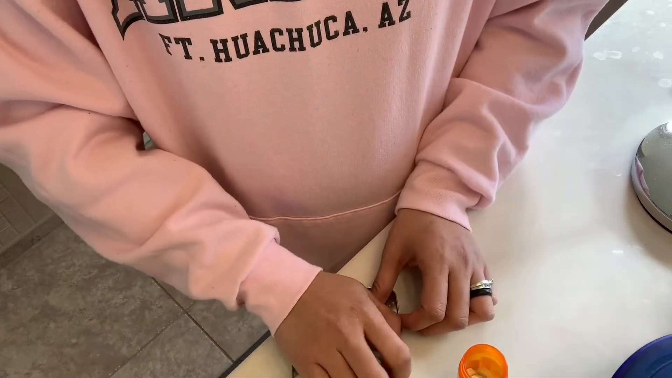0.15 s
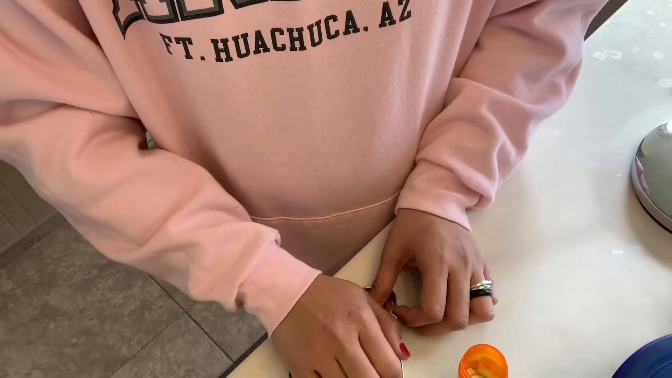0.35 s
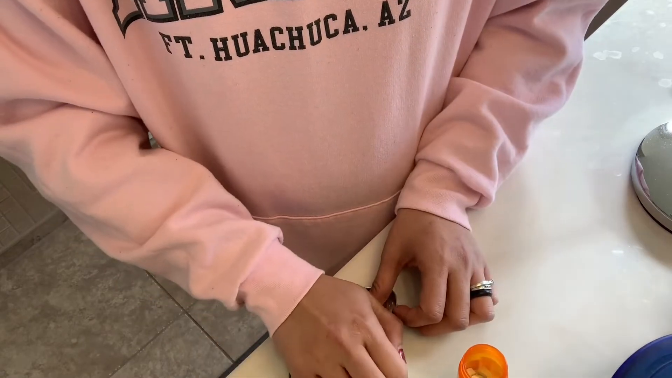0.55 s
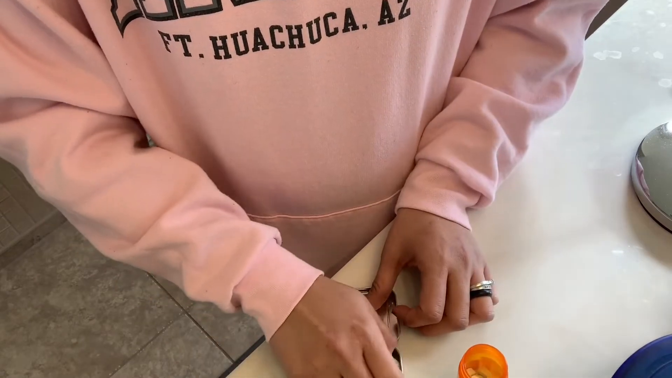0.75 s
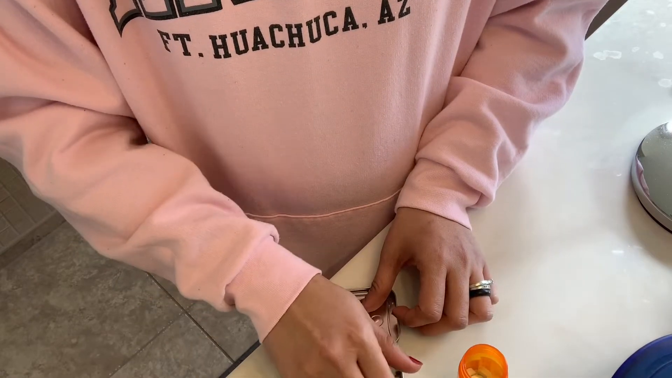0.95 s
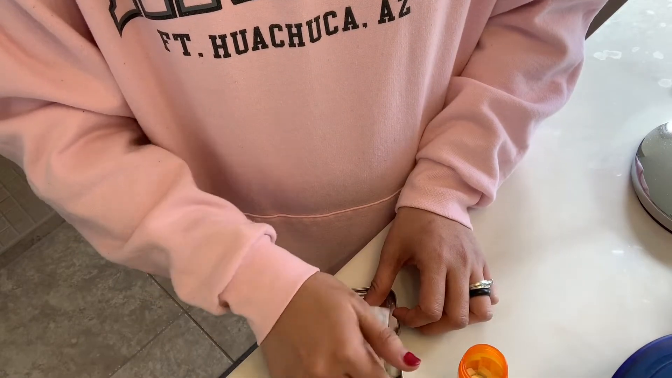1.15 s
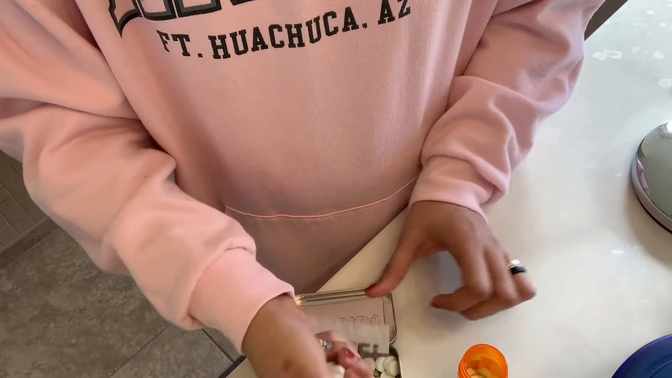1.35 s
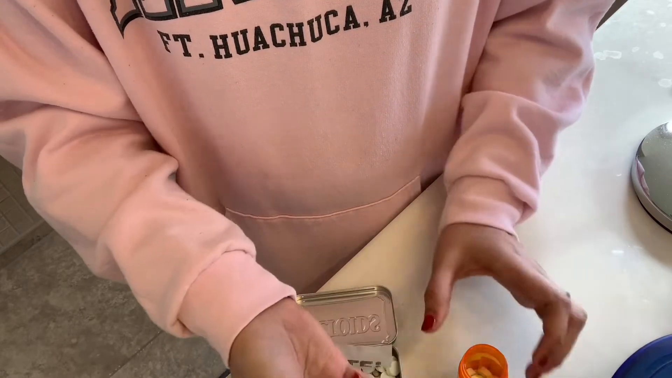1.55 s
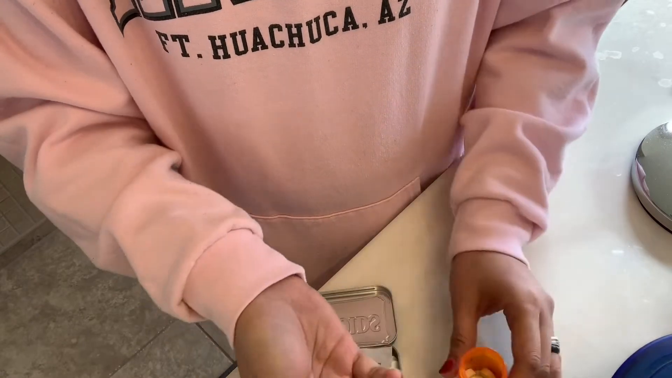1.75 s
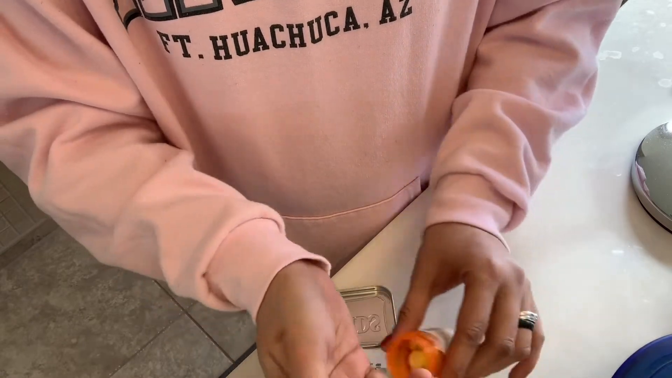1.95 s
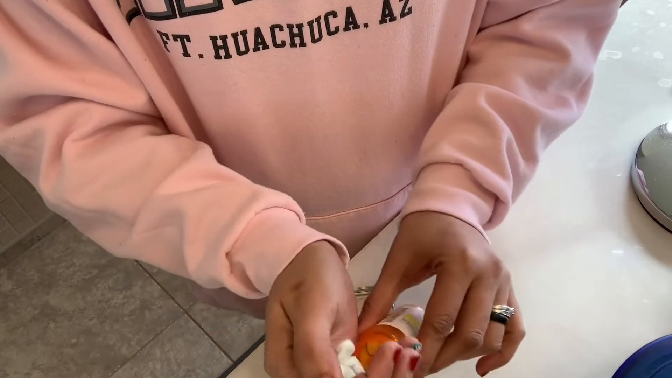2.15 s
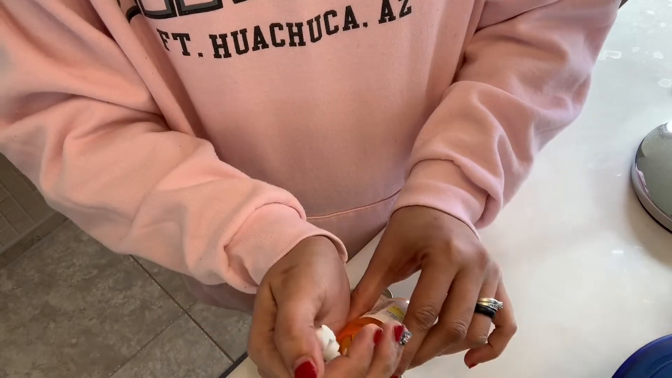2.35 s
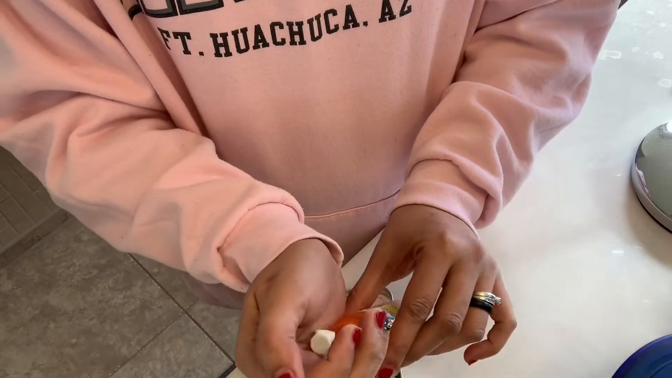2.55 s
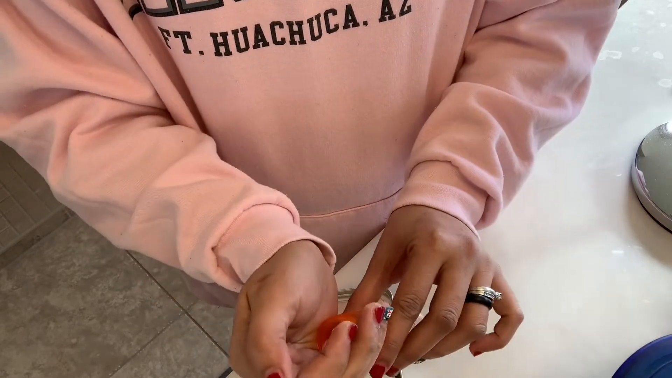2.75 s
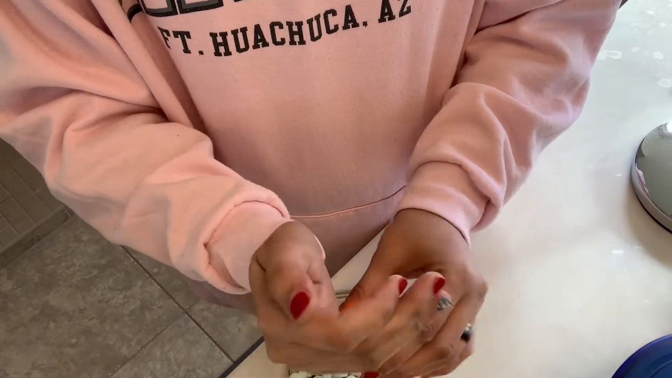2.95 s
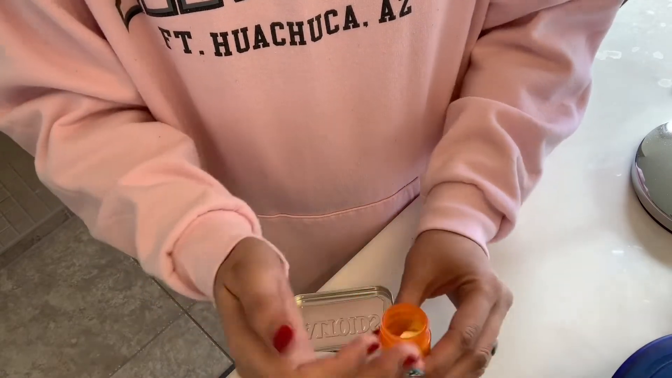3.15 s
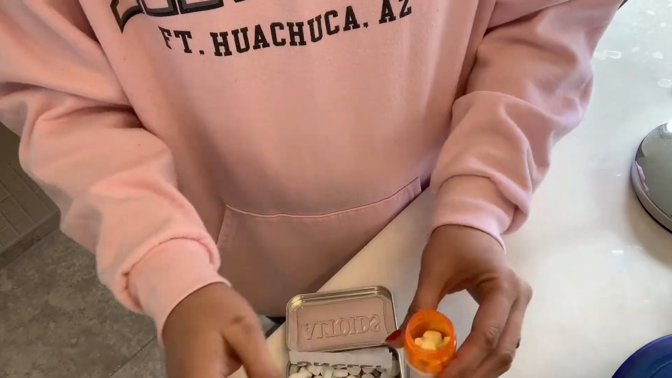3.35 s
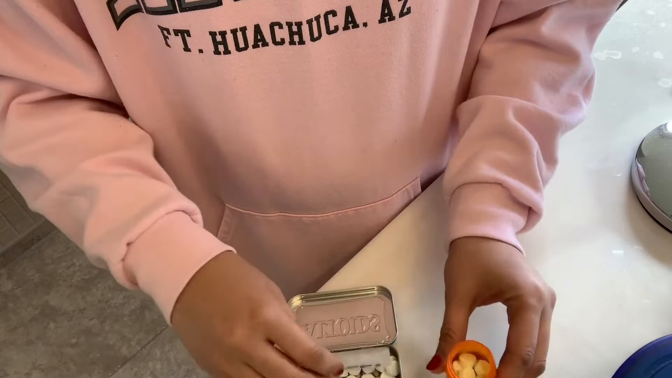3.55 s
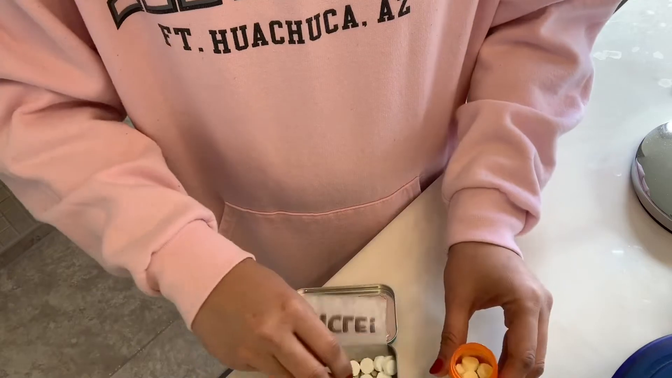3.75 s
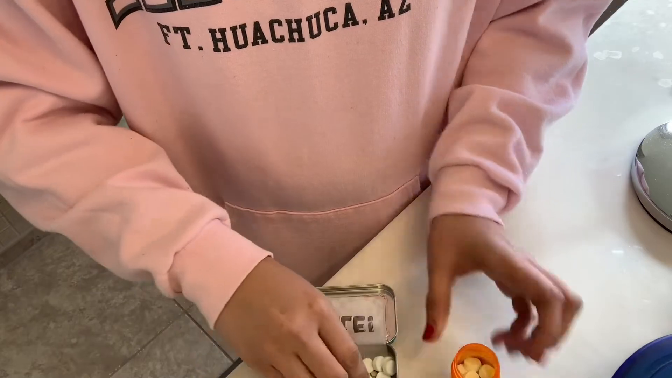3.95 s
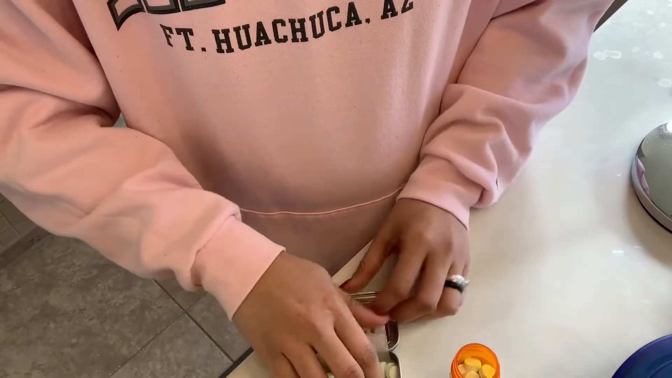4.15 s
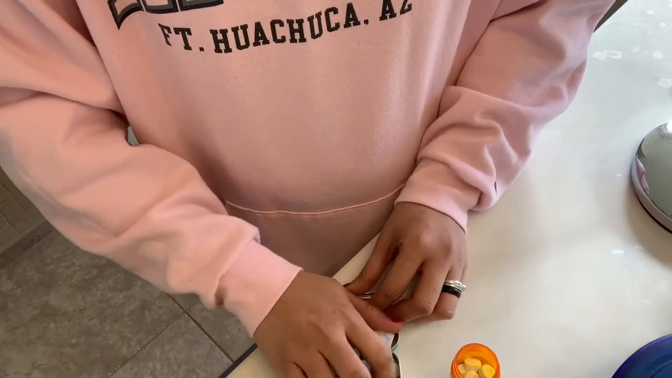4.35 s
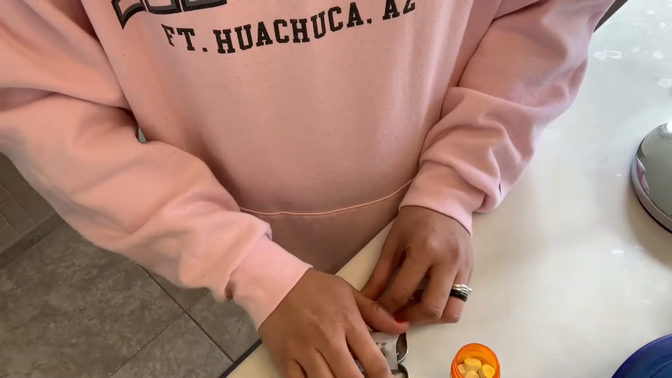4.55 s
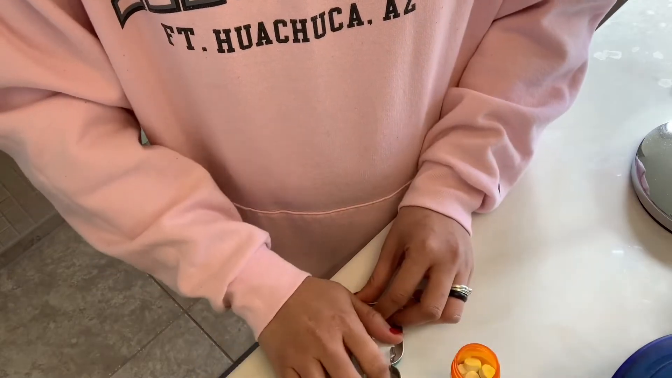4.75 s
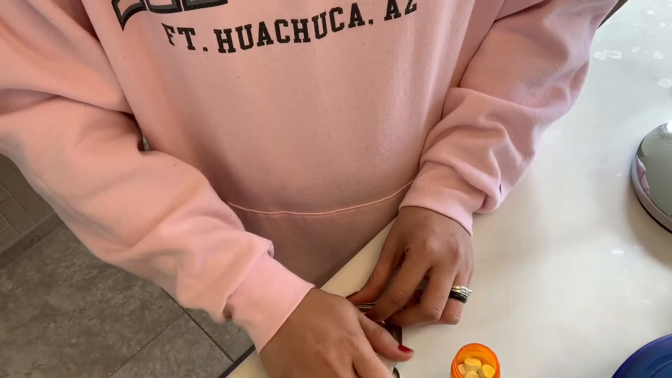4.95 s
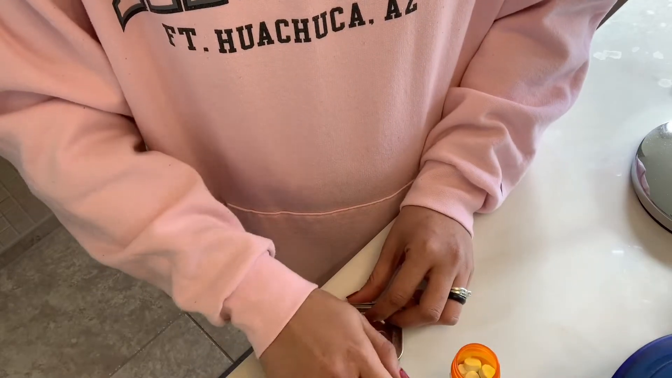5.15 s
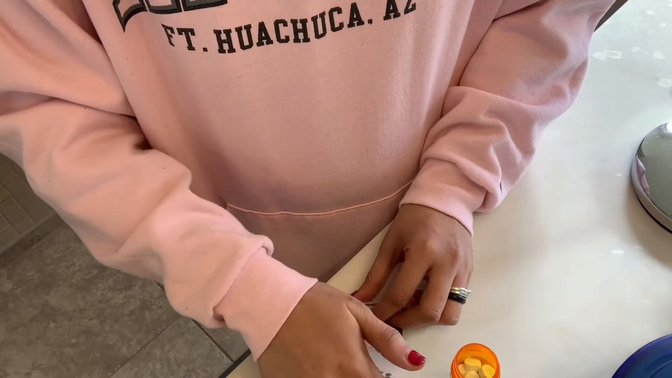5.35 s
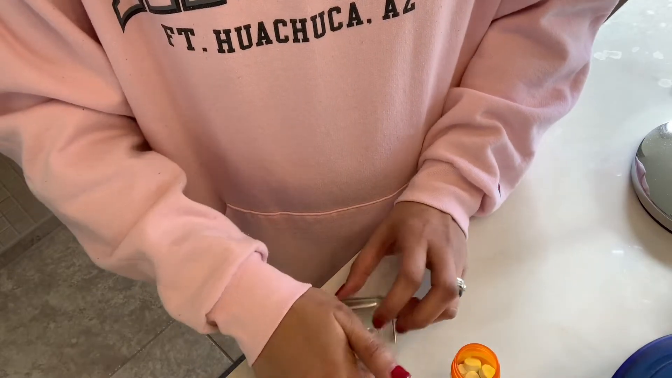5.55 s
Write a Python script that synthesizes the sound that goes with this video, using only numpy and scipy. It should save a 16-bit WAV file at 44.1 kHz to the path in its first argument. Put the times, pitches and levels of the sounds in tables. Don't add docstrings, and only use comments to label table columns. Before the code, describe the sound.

A close stereo microphone in a hard-walled kitchen, with a low unsteady fridge hum and very faint air. From 0 to 1.3 s fingers stir hard mints in a thin steel tin: dense, bright, irregular ticks of very unequal strength over a scraping chatter, with short metallic ringing. At 1.34 s the lid gives a sharp dry snap with a soft after-knock. Light fingertip taps on plastic come at 1.5 to 2.1 s. From 2.2 to 2.8 s mints patter into a small plastic bottle, each click followed by a brief hollow hum; a few weaker landings and grip clicks continue from 3.0 to 3.5 s. At 3.6 s fingers return to the tin, picking, then raking more densely from 4.7 s, thinning after 5.3 s. At 5.6 s the lid flicks, cracking loudest at 5.62 s with quick rebounds and a rattle. Soft low hand thuds on the counter recur; walls return a short bright echo.

```python
import sys
import numpy as np
from scipy import signal
from scipy.fft import rfft, irfft, next_fast_len
from scipy.io import wavfile
from scipy.ndimage import uniform_filter1d, map_coordinates

SR = 44100
rng = np.random.default_rng(int(sys.argv[2]) if len(sys.argv) > 2 else 0)


def digitize_waveform(pressure):
    field = np.atleast_2d(pressure).T
    bounded = np.clip(field, -1, 1)
    quanta = np.round(bounded * 32767).astype(np.int16)
    wavfile.write(sys.argv[1], SR, quanta)


def convert_level_to_amplitude(level_db):
    exponent = np.asarray(level_db, float) / 20
    return 10 ** exponent


N = 250929

# f/Hz, level per Hz/dB
FRIDGE_COLOUR = [(15, -3.5), (30, -11.5), (42, -11), (56, -3.5), (68, -10), (88, -7), (100, -5), (107, 0.5),
                 (115, -9.5), (150, -23), (220, -36), (480, -120)]
# f/Hz, level per Hz/dB
AIR_COLOUR = [(150, -37.5), (250, -4.5), (313, -14.5), (501, -14), (1060, -14.5), (2090, -24),
              (4500, -16.5), (9000, -32), (16000, -24)]
# t/s, hold/s, thud level/dB, counter boom level/dB
PRESSES = [(0, .03, -85, -55), (0.36, 0.034, -49.5, -52), (0.552, .02, -61, -70),
           (1.164, 0.015, -50, -51.5), (1.354, 0.043, -52, -51.5), (2.327, 0.057, -66, -51.5),
           (2.953, .03, -70, -60), (3.671, 0.008, -43, -53), (3.74, .005, -60, -64),
           (3.84, 0.059, -55, -56), (4.126, 0.13, -59, -56), (4.338, 0.021, -46, -52.5),
           (4.73, 0.21, -50.5, -48), (5.09, .05, -67, -62), (5.44, .03, -52.5, -74),
           (5.66, .05, -45.5, -43)]
# t/s, hold/s, chatter level/dB, tin body re chatter/dB
STROKES = [(0, 0.019, -49, 5), (0.12, 0.021, -48.5, 1.5), (0.17, 0.0025, -42.5, 2),
           (0.332, 0.025, -37, 2.5), (0.508, 0.8, -42.5, 2), (0.74, 0.045, -39.5, -4),
           (0.91, 0.32, -43, -0.5), (1.27, 0.24, -48, -0.5), (1.765, 0.026, -70.5, 11),
           (2.235, 0.83, -73, 15), (2.94, 0.092, -75, 5), (3.086, 0.076, -65.5, 3), (3.666, 0.36, -47, 1.5),
           (3.984, 0.013, -56, 3), (4.071, 0.17, -43, -10), (4.319, 0.014, -38.5, -2),
           (4.357, 0.13, -60, 0), (4.471, 0.14, -43, -5.5), (4.683, 0.23, -39.5, -3),
           (4.95, 0.11, -43.5, 1.5), (5.108, 0.12, -43.5, 3.5), (5.191, 0.011, -36.5, 1),
           (5.265, 0.86, -42, -2.5)]
# f/Hz, level per Hz/dB
MINT_COLOUR = [(1300, -19.5), (2200, -6), (4000, -3), (7000, -3), (8300, 0.5), (10000, -1), (11500, -3.5),
               (14500, -4.5), (15700, -11.5), (16300, -41)]
# f/Hz, width/Hz, level/dB
TIN_MODES = [(660, 89, -1), (880, 38, 2), (1087, 160, -1.5), (1478, 173, 0), (1870, 100, 3),
             (2900, 640, -6)]

# t/s, click peak/dB, body re click/dB, click ring f/Hz, body ring f/Hz
GRIPS = [(.003, -36.5, -2, 5920, 1267), (1.5404, -48.5, -15, 8900, 600), (1.5829, -35.5, -63.5, 13100, 960),
         (1.751, -44.5, -11, 5000, 1003), (1.8286, -63, -24, 6100, 945), (2.042, -72.5, 6, 4260, 880),
         (2.0789, -64.5, -7, 4760, 894), (2.1005, -48.5, -16.5, 4420, 800), (3.0486, -39, -12, 7400, 2350),
         (3.072, -38.5, -9.5, 10350, 2470), (3.181, -56.5, 7.5, 3970, 880), (3.197, -63, 4, 3970, 880),
         (3.29, -56, -10, 7700, 1020), (3.4798, -72, 6, 8030, 840), (3.514, -48.5, -23.5, 4560, 840)]
# t/s, click peak/dB, body re click/dB,
# mint ring f/Hz, sheet ring f/Hz
TIN_KNOCKS = [(0.0281, -40, 6, 8520, 1100), (0.0854, -35, -6, 8600, 1150), (0.1058, -26, -2.5, 6130, 1880),
              (0.1289, -39, -3, 4290, 1600), (0.1468, -40.5, 8.5, 9840, 1870),
              (0.1695, -23, -7, 7000, 1800), (0.178, -23.5, 1.5, 9420, 1760), (0.2022, -36, -5, 8300, 690),
              (0.2271, -45.5, -0.5, 4090, 1890), (0.2505, -40, -15, 5470, 1850),
              (0.2612, -39, -8, 9450, 1870), (0.2712, -33, 1, 10000, 2780), (0.2792, -36.5, -5, 7900, 880),
              (0.3053, -28, -6, 6960, 1600), (0.3158, -29, -8, 7100, 1370), (0.3225, -31, -2, 9960, 1390),
              (0.3366, -36, 3.5, 10140, 1630), (0.3505, -35.5, 4, 10440, 630),
              (0.3613, -43.5, 11, 3870, 1490), (0.3731, -32.5, -2.5, 8060, 645),
              (0.3782, -37, -1.5, 7900, 643), (0.3864, -32.5, 0, 7150, 1890),
              (0.4233, -31.5, -18, 3360, 1910), (0.512, -30, -9, 7700, 620), (0.5477, -34, 1, 8990, 660),
              (0.5817, -42, 9.5, 9460, 696), (0.595, -39, 0, 3300, 1570), (0.6178, -39.5, 4, 9260, 744),
              (0.6234, -32, -8, 4930, 1900), (0.6478, -39, -4.5, 3200, 1400),
              (0.658, -24.5, -22, 8680, 1810), (0.6696, -33, -10, 7640, 1530), (0.6857, -43.5, 2, 8100, 1770),
           (0.6974, -44, -7.5, 8100, 740), (0.7328, -38.5, -5.5, 10300, 720),
           (0.7442, -37.5, 0.5, 5300, 645), (0.7567, -28, -2, 3200, 845), (0.7645, -28, -4, 7930, 1430),
           (0.7742, -26.5, -8, 9700, 1660), (0.7835, -31, 0, 8600, 880), (0.805, -32, -4, 5160, 1570),
           (0.8101, -31, 1, 3230, 1400), (0.838, -39, -6, 3180, 1390), (0.8509, -31, -2.5, 5200, 1430),
           (0.8783, -26.5, -4.5, 8090, 880), (0.8952, -29, -2, 8150, 1120), (0.909, -35, -1, 8160, 1560),
           (0.9174, -36, 3, 8510, 1860), (0.922, -39.5, -6.5, 8100, 1530), (0.9323, -38.5, 2.5, 8140, 690),
           (0.9526, -22.5, -2, 3000, 1690), (0.9746, -32.5, -6.5, 8950, 674), (0.999, -34, -8, 8350, 1710),
           (1.0195, -27.5, -5.5, 8150, 1900), (1.027, -32, -12, 8100, 1590),
           (1.0507, -36, -11.5, 8040, 1900), (1.06, -38.5, -8.5, 8700, 1240),
           (1.0682, -42, 3.5, 8100, 1690), (1.0746, -43, -13.5, 8000, 1450), (1.1247, -39, 5.5, 4000, 1500),
           (1.142, -29.5, -3.5, 7760, 700), (1.1682, -31.5, -0.5, 10400, 714),
           (1.2163, -43, 0.5, 5640, 1910), (1.297, -41.5, 4.5, 9700, 2460),
              (3.5797, -43.5, 1.5, 8150, 680), (3.5928, -37.5, -4.5, 5240, 830), (3.621, -31.5, -12, 8200, 1630),
         (3.636, -48.5, 9.5, 8100, 900), (3.6485, -30, -10, 3500, 2070), (3.6677, -31, -4.5, 9600, 820),
         (3.6838, -35.5, -2, 8440, 1430), (3.6941, -30, -5.5, 8160, 1880), (3.726, -20.5, -7.5, 8220, 660),
         (3.7392, -38, -7, 7850, 1880), (3.7718, -41, -13, 8400, 1430), (3.7805, -22.5, -9.5, 10050, 2600),
         (3.79, -22.5, -21.5, 8400, 2960), (3.8048, -34.5, -4, 8250, 590), (3.8136, -36.5, -11, 8700, 1100),
         (3.8894, -30, -10, 4300, 880), (3.8983, -32, -6.5, 5130, 660), (3.9548, -26.5, -3, 9400, 1880),
         (4.0317, -27, -2, 4750, 2620), (4.0541, -31.5, -4, 10030, 820), (4.0805, -34, -3, 3970, 800),
         (4.092, -28, -17, 9500, 1370), (4.1077, -29, -24.5, 8100, 2460), (4.1432, -27.5, -16, 4530, 2880),
         (4.1495, -33, -4.5, 8150, 1730), (4.1764, -27.5, -9, 9300, 1420), (4.2252, -37.5, -5, 8600, 1490),
         (4.2836, -38, -13, 4770, 1520), (4.298, -29, -17, 8300, 1890), (4.3111, -18, -17, 8740, 1890),
         (4.3254, -32, -0.5, 5230, 1870), (4.3336, -34, 0.5, 10300, 1480), (4.341, -24.5, -5, 9800, 1860),
         (4.3503, -34.5, 4.5, 8300, 1870), (4.4725, -34, -6, 8500, 1600), (4.4902, -30, -8, 8100, 1740),
         (4.4921, -28, -11, 10000, 1880), (4.505, -26.5, -7.5, 9240, 1880), (4.5598, -38, -7, 9800, 1810),
         (4.5755, -32, -12, 8400, 1430),
              (4.674, -36, -3, 8360, 1810), (4.7162, -29.5, 2, 9400, 2050), (4.7313, -32, 8.5, 10020, 1860),
         (4.7352, -30.5, -2, 7800, 2140), (4.7734, -29.5, -1.5, 9380, 1160),
         (4.7909, -32.5, -3.5, 7900, 680), (4.805, -27, -9, 9900, 1370), (4.8151, -33, 9, 8940, 1410),
         (4.8394, -29, -3.5, 8200, 720), (4.8584, -26.5, -6, 8340, 640), (4.8781, -28, 1, 8230, 1530),
         (4.889, -32.5, -5, 5850, 1200), (4.9082, -32.5, 0, 9850, 1470), (4.9262, -38, 5.5, 8750, 1890),
         (4.93, -36.5, 2, 8460, 2600), (4.9407, -22, -6.5, 7780, 1820), (4.9453, -20.5, -16.5, 8060, 1880),
         (4.978, -30, -15, 8900, 1580), (4.9896, -30, -3, 3350, 670), (5.0058, -29.5, -1, 3140, 2720),
         (5.0287, -41, -1, 8260, 1610), (5.0348, -27.5, -5.5, 8330, 1470), (5.0421, -32.5, 2, 8850, 970),
         (5.0689, -42.5, 12.5, 7940, 894), (5.102, -31, 3, 5500, 1180), (5.1462, -37.5, 8, 9910, 1500),
         (5.1624, -31.5, -1.5, 4400, 1480), (5.1807, -33, -5, 5350, 706), (5.1957, -47, -6, 9700, 1290),
         (5.201, -38, 10, 10600, 1350), (5.2162, -24.5, -7, 4900, 1520), (5.3291, -41, -4, 3140, 730),
         (5.3665, -35, -6, 7850, 1160), (5.3972, -32, -9, 8500, 615), (5.4103, -35.5, -1.5, 5140, 1600),
         (5.4288, -33.5, -2, 9900, 750), (5.472, -31, -11, 8590, 1400), (5.5216, -46.5, 6.5, 3470, 1870),
         (5.542, -34, -4, 4930, 1700), (5.5554, -37.5, -3, 8100, 2860)]

# t/s, peak/dB, t60/s, sheet re peak/dB
SNAPS = [
    (1.3404, -13, 0.017, -15.5),
    (1.3425, -7, 0.0065, -6),
    (1.363, -31, 0.022, 4),
    (5.602, -22, 0.097, -13.5),
    (5.619, -5.5, 0.005, -3),
    (5.623, -11, 0.0068, -14.5),
    (5.6312, -12, 0.009, -11),
    (5.652, -19, 0.042, -6),
]
# f/Hz, width/Hz, level/dB
LID_MODES = [(1600, 200, 4.5), (1880, 23, 9.5), (2221, 45, 13.5), (3750, 35, 3), (4915, 23, 4.5),
             (5520, 20, 13), (6470, 31, -10.5), (7060, 45, -0.5), (7860, 14, -4.5), (8090, 90, 15),
             (8710, 27, 3), (9300, 69, 16), (9876, 33, 6.5), (11100, 31, 12.5)]
# f/Hz, width/Hz, level/dB
LID_FLEX = [(680, 200, -9.5), (1580, 130, -1), (1890, 100, 1.5), (2306, 200, 4.5)]
# t/s, click peak/dB, body re click/dB, mint ring f/Hz
DROPS = [(2.2063, -37.5, -1.5, 4400), (2.2453, -46, -10, 8950), (2.2523, -36.5, -13, 4700),
         (2.2626, -26.5, -17.5, 7700), (2.2801, -23.5, -43, 9300), (2.2852, -36, -17, 5280),
         (2.3063, -54, 8, 8890), (2.3268, -34.5, -18, 4540), (2.4063, -32.5, -15, 8160),
         (2.433, -30, -6.5, 4380), (2.4995, -22, -47, 10000), (2.5106, -28.5, -10.5, 8200),
         (2.5166, -25.5, -27, 9300), (2.5807, -34.5, -22, 6100), (2.6085, -39, -3.5, 8500),
         (2.6569, -31.5, -11, 7500), (2.6672, -32.5, -14, 6170), (2.683, -32.5, -14, 8100),
         (2.6979, -29, -24, 9050), (2.7732, -39.5, -17, 8700), (2.8196, -32, -21.5, 8100),
         (3.0352, -49, -7, 7700), (3.0585, -47, -4, 8100), (3.0792, -57, -16, 10500),
         (3.1429, -62, -22, 3930), (3.157, -35, -12, 3820), (3.2163, -42, -24, 9300),
         (3.3011, -48, -11.5, 8900)]
# f/Hz, width/Hz, level/dB
BOTTLE_MODES = [(810, 170, -6), (1940, 930, -4.5), (2450, 680, -3)]
# f/Hz, t60/s, echo level/dB
KITCHEN = [(300, 0.24, -1), (800, 0.37, -5), (2070, 0.45, -1.5), (5360, 0.25, 0), (9800, 0.27, -5),
           (14600, 0.14, -9.5)]

# f/Hz, left minus right/dB
PORT_TILT = [(60, 7), (110, -2.5), (200, -5.5), (380, 1), (700, -2.5), (1290, -1), (2380, -1.5), (4400, -1),
             (8120, 3), (15000, -1)]
# f/Hz, phase lead/rad
PORT_LEAD = [(0, 0), (500, -.5), (1000, 0), (2500, -2), (4500, -2.8), (6000, -3.5), (7500, -6.2),
             (8100, -6.2), (9000, -3.14), (16050, 15.7)]
# f/Hz, likeness (0 to 1)
PORT_LIKENESS = [(300, 0.75), (1200, 0.64), (2100, 0.45), (4500, 0.44), (6500, 0.16), (8400, 0.22),
                 (9500, 0.63), (10500, 0.93), (16000, 0.81)]


def unit(x):
    return x / np.sqrt(np.mean(x ** 2) + 1e-20)


def along(points, hz):
    f, v = np.transpose(points)
    return np.interp(np.log(hz + 1), np.log(f + 1), v)


def filtered(x, response):
    m = next_fast_len(N + SR // 2)
    hz = np.fft.rfftfreq(m, 1 / SR)
    return irfft(rfft(x, m) * response(hz), m)[..., :N]


def flat(response):
    return lambda hz: response(hz) / np.sqrt(np.mean(np.abs(response(hz)) ** 2))


def colour(spectrum):
    return flat(lambda hz: convert_level_to_amplitude(along(spectrum, hz)))


def resonances(modes):
    def response(hz):
        total = 0
        for k, (centre, width, db) in enumerate(modes):
            damping = 1j * hz * width
            total = total + (-1) ** k * convert_level_to_amplitude(db) * damping / (centre ** 2 - hz ** 2 + damping)
        return total
    return flat(response)


def burst(t, t60, rise):
    t60 = max(t60, .002)
    shape = (1 - np.exp(-t / (rise * t60))) ** 2 * convert_level_to_amplitude(-60 * t / t60)
    return shape / shape.max()


def strokes(rows, rise, sag, fall):
    t = np.arange(0, N + 64, 64) / SR
    s, hold, db = np.transpose(rows)[:, :, None]
    loss = rise * np.maximum(s - t, 0)
    loss = loss + sag * np.clip(t - s, 0, hold)
    loss = loss + fall * np.maximum(t - s - hold, 0)
    gain = np.sqrt(np.sum(convert_level_to_amplitude(db - loss) ** 2, axis=0))
    return np.interp(np.arange(N) / SR, t, gain)


def ports(pair):
    side = np.array([[.5], [-.5]])

    def spread(hz):
        turn = np.arccos(np.clip(along(PORT_LIKENESS, hz), 0, 1)) / 2
        return np.array([np.cos(turn), np.sin(turn)])

    def tilt(hz):
        lead = np.interp(hz, *np.transpose(PORT_LEAD))
        return convert_level_to_amplitude(side * along(PORT_TILT, hz)) * np.exp(1j * side * lead)

    same, other = filtered(pair, spread)
    return filtered(np.array([same + other, same - other]), tilt)


def low_noise(difference, spectrum):
    noise = rng.standard_normal(N) + difference * rng.standard_normal((2, N))
    return unit(filtered(noise, colour(spectrum)))


def background():
    s, hold, thud_db, boom_db = np.transpose(PRESSES)
    slopes = np.array([260, 68, 113])  # rise, sag, fall in dB per s
    sway = map_coordinates(rng.standard_normal(N // SR * 8 + 16), [np.arange(N) * 6 / SR])
    hum = convert_level_to_amplitude(-56.5 + 3.5 * sway)
    boom = strokes(np.c_[s, hold, boom_db], *0.37 * slopes)
    low = np.hypot(hum, boom) * low_noise(0.12, FRIDGE_COLOUR)

    rub = convert_level_to_amplitude(-20) * fingers()[1]
    press = np.hypot(strokes(np.c_[s, hold, thud_db], *slopes), rub)
    thud_colour = [(90, -30.5), (160, 0.5), (450, -3.0), (650, -28), (1500, -79.0)]  # f/Hz, level/dB
    thud = convert_level_to_amplitude(-8.0) * press * low_noise(0.19, thud_colour)

    air = unit(filtered(rng.standard_normal((2, N)), colour(AIR_COLOUR)))
    return low + thud + convert_level_to_amplitude(-81) * ports(air)


def fingers():
    s, hold, db, body_db = np.transpose(STROKES)
    slopes = dict(rise=215, sag=33.2, fall=240)
    chatter = strokes(np.c_[s, hold, db], **slopes)
    body = strokes(np.c_[s, hold, db + body_db], **slopes)
    return chatter, body


def contacts(per_s, spread_db, t60):
    happens = rng.random(N) < per_s / SR
    sizes = happens * convert_level_to_amplitude(spread_db * np.minimum(rng.exponential(size=N), 3))
    shape = burst(np.arange(SR // 20) / SR, t60, 0.13)
    return unit(signal.fftconvolve(sizes, shape)[:N] * rng.standard_normal((2, N)))


def pings(lo_hz, hi_hz, cycles, spread_db, count):
    when, pitch, size, *turns = rng.random((count, 5)).T[:, :, None]
    k = np.arange(SR // 60)
    wave = lo_hz * (hi_hz / lo_hz) ** pitch * k / SR
    shape = convert_level_to_amplitude(-spread_db * np.log(size + 0.029)) * (1 - np.exp(-wave)) * np.exp(-wave / cycles)
    at = ((when * N).astype(int) + k).ravel()
    pair = []
    for turn in turns:
        ring = shape * np.sin(2 * np.pi * (wave + turn))
        pair.append(np.bincount(at, ring.ravel(), N)[:N])
    return unit(np.array(pair))


def stirring():
    chatter, body = fingers()
    scrape = contacts(per_s=170, spread_db=2.5, t60=.007)
    mint_pings = pings(2500, 13000, cycles=14, spread_db=3, count=2000)
    ticks = unit(filtered(1.2 * scrape + mint_pings, colour(MINT_COLOUR)))
    sheet_pings = pings(548, 2880, cycles=18.0, spread_db=7.0, count=1200)
    sheet = unit(filtered(sheet_pings + 3.0 * scrape, resonances(TIN_MODES)))
    return convert_level_to_amplitude(-3) * chatter * ticks + convert_level_to_amplitude(-8) * body * sheet


def lasting(rows):
    rows = np.array(rows, float)
    flatness = .025 * (rows[:, 2] + 10)
    scatter = .25 * rng.standard_normal(len(rows))
    return np.c_[rows, .0017 * np.exp(flatness + scatter)]


def knocks(rows, body, body_db, tone_db, tone_t60, rise, fall):
    lead = SR // 50
    t = np.arange(-lead, 4 * lead) / SR
    click, push, tone = np.zeros((3, 2, N + SR))
    for s, db, rel_db, mint_hz, body_hz, length in lasting(rows):
        start = round(s * SR)
        at = slice(start, start + len(t))
        shape = np.exp(np.minimum(t / rise, -t / fall) / max(length, .0005))
        crack, shove = rng.standard_normal((2, 2, len(t)))
        turn = 2 * np.pi * rng.random((2, 1))
        tick = shape * (crack + 0.63 * np.sin(2 * np.pi * mint_hz * t + turn))
        click[:, at] += convert_level_to_amplitude(db + 2.0) * tick / np.abs(tick).max(axis=1, keepdims=True)
        push[:, at] += convert_level_to_amplitude(db + rel_db + body_db) * shape * shove
        swell = burst(np.maximum(t + rise * length, 0), tone_t60, 0.012)
        ring = swell * np.sin(2 * np.pi * body_hz * t + turn)
        tone[:, at] += convert_level_to_amplitude(db + rel_db + tone_db) * ring
    click, push, tone = (v[:, lead:lead + N] for v in (click, push, tone))
    return filtered(click, colour(MINT_COLOUR)) + filtered(push, resonances(body)) + tone


def gripping():
    return knocks(GRIPS, BOTTLE_MODES, body_db=2.0, tone_db=-3.0, tone_t60=0.07, rise=0.75, fall=1.0)


def mints_in_tin():
    rows = TIN_KNOCKS
    mints = knocks(rows, TIN_MODES, body_db=-7.5, tone_db=-6.5, tone_t60=0.032, rise=0.44, fall=1.0)
    mints = mints + stirring()
    return mints + convert_level_to_amplitude(-14.5) * filtered(mints, resonances(LID_MODES))


def lid():
    blows, pushes = np.zeros((2, 2, N + SR))
    t = np.arange(SR // 10) / SR
    for s, db, t60, sheet_db in SNAPS:
        blow = burst(t, t60, 0.12) * rng.standard_normal((2, len(t)))
        blow = convert_level_to_amplitude(db - 3.5) * blow / np.abs(blow).max(axis=1, keepdims=True)
        start = round(s * SR)
        blows[:, start:start + len(t)] += blow
        pushes[:, start:start + len(t)] += convert_level_to_amplitude(sheet_db) * blow

    def steel(hz):
        return convert_level_to_amplitude(1) * resonances(LID_MODES)(hz) + convert_level_to_amplitude(1.4) * colour(MINT_COLOUR)(hz)

    return filtered(blows[:, :N], steel) + filtered(pushes[:, :N], resonances(LID_FLEX))


def mints_in_bottle():
    s = np.transpose(DROPS)[0]
    empty_hz, fill_s, rise_hz_per_s2 = 779, 2.35, 110
    note = empty_hz + rise_hz_per_s2 * (s - fill_s) ** 2
    note = note * np.exp(0.013 * rng.standard_normal(len(s)))
    rows = np.c_[DROPS, note]
    landings = knocks(rows, BOTTLE_MODES, body_db=-1.5, tone_db=-6.0, tone_t60=0.068, rise=0.51, fall=1.0)
    return filtered(landings, lambda hz: 1 / (1 + 1j * hz / 11000) ** 2)


def kitchen(x):
    frames = dict(nperseg=384, noverlap=256)
    hz, t, z = signal.stft(x, SR, **frames)
    centre, t60, echo_db = np.transpose(KITCHEN)
    keep = convert_level_to_amplitude(-120 * (t[1] - t[0]) / along(np.c_[centre, t60], hz))
    power = []
    for k, row in zip(keep, np.abs(z) ** 2):
        power.append(signal.lfilter([0, 0, 1 - k], [1, -k], row))
    power = np.array(power)
    blur = np.clip(hz / 3000 - .3, 0, .5)[:, None]
    power = (1 - blur) * power + blur * uniform_filter1d(power, size=9, axis=0)
    field = signal.stft(rng.standard_normal((2, N)), SR, **frames)[2]
    field = field / np.sqrt(np.mean(np.abs(field) ** 2))
    field = field * convert_level_to_amplitude(along(np.c_[centre, echo_db], hz))[:, None]
    return signal.istft(field * np.sqrt(np.abs(power)), SR, **frames)[1][:, :N]


def scene():
    near = gripping() + mints_in_tin() + lid() + mints_in_bottle()
    return ports(near + kitchen(near[0])) + background()


def low_pass(x):
    return signal.sosfilt(signal.butter(12, 16480, fs=SR, output="sos"), x)


def record(dry):
    return low_pass(dry)


dry = scene()
out = record(dry)
digitize_waveform(out)
```